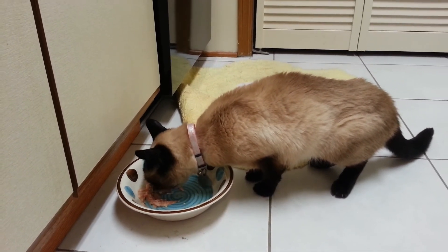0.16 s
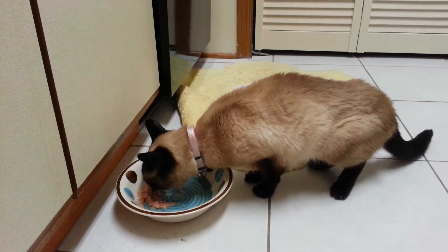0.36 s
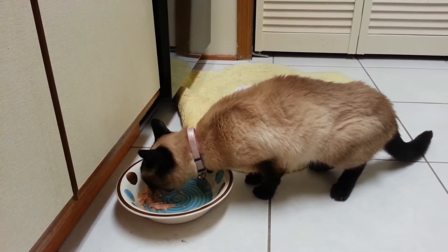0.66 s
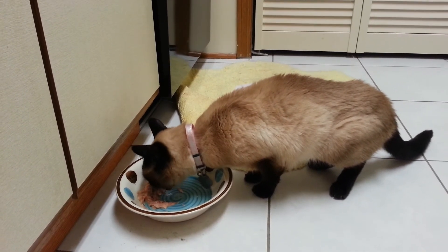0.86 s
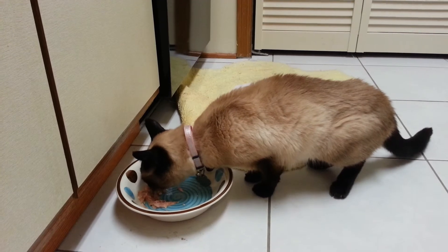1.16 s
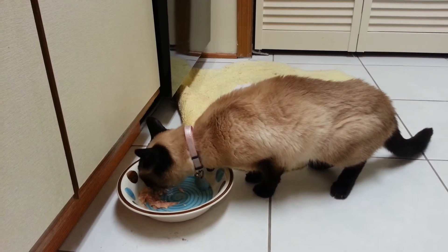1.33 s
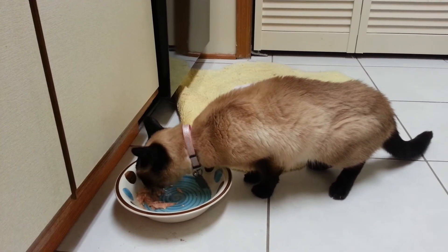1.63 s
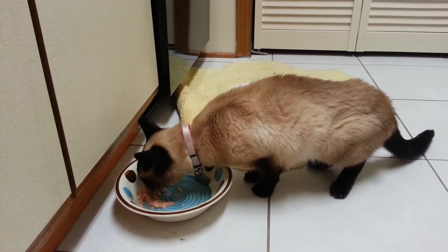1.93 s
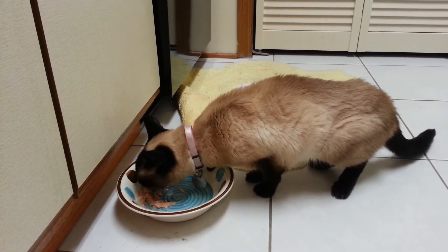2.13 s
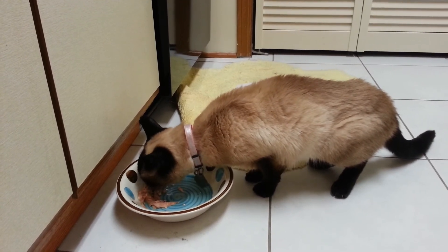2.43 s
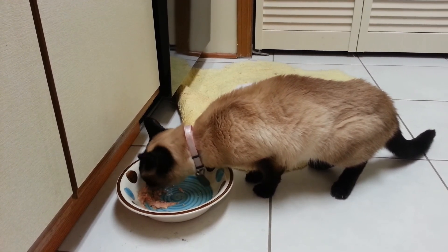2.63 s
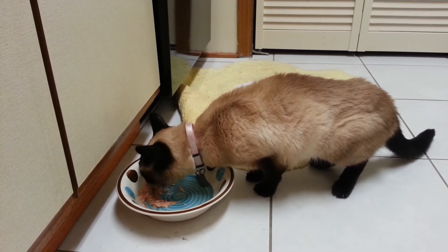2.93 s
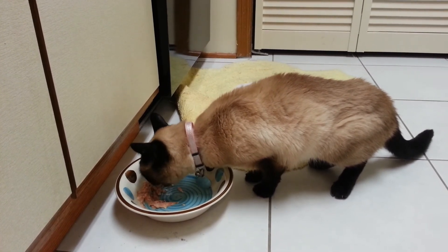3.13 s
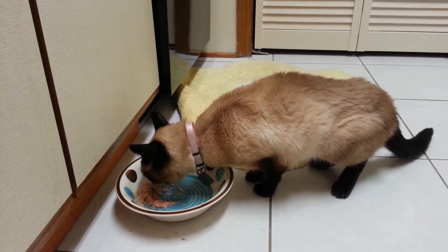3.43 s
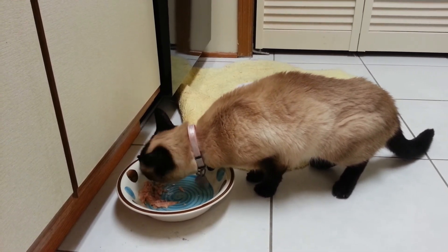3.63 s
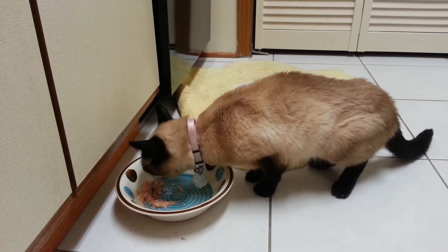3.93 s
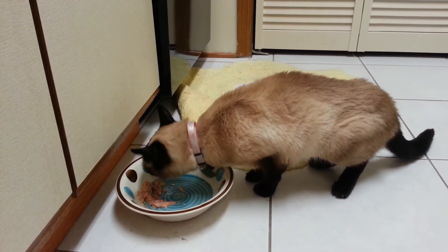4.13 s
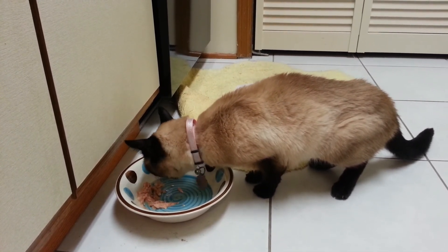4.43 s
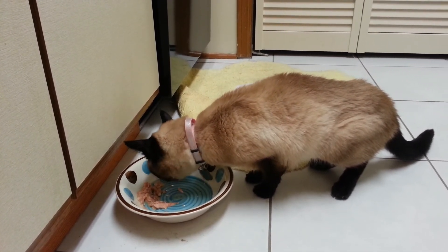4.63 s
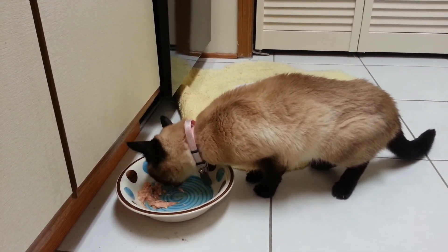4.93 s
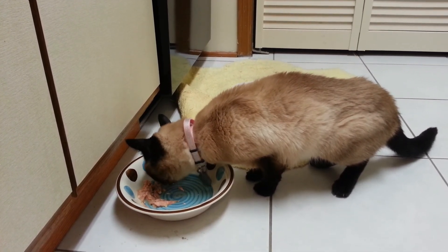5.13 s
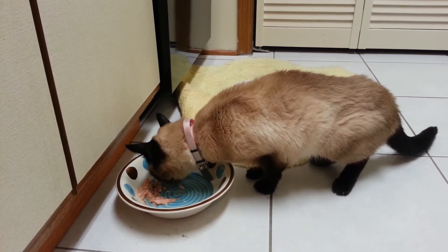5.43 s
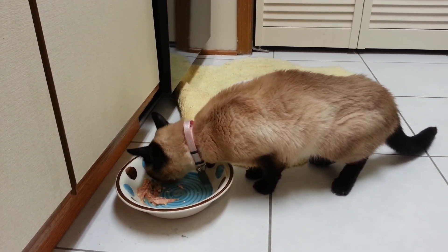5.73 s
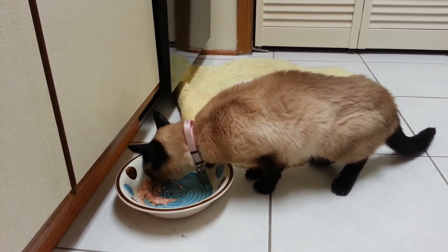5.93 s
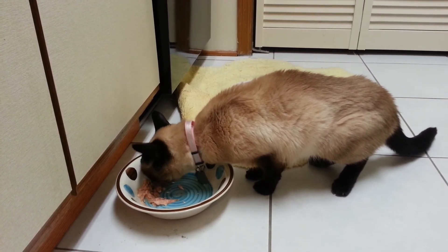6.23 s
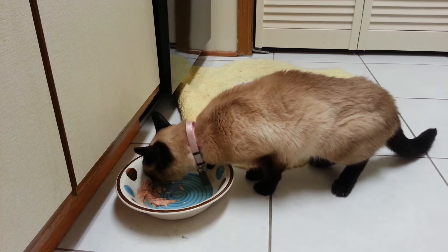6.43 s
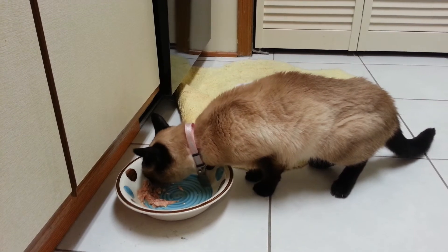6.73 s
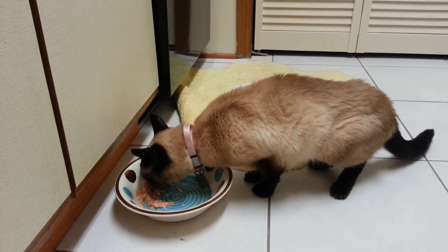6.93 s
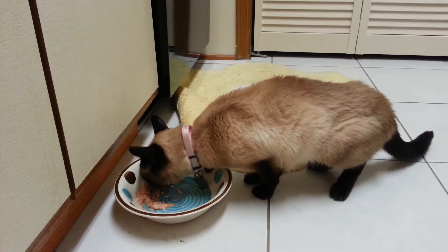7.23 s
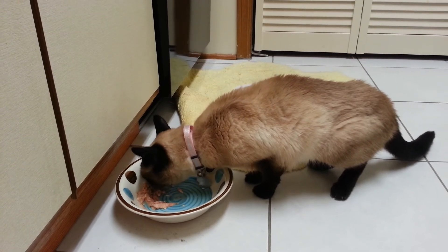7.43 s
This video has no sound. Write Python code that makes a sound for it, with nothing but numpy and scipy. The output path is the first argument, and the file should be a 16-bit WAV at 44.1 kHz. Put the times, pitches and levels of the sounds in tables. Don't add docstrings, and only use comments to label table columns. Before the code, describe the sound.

A cat eats wet food from a ceramic bowl on a tiled floor, heard close in a small hard room. Soft sticky smacks and clinks on the bowl open the scene at 0.1 and 0.35 seconds, with another clink near 0.75. The collar bell rattles quickly from 0.9 to 1.2, then in looser bursts to 2, with a bowl tap near 1.5. Wet ticks gather around 2.1, and a clink at 2.6 leads into the loudest, busiest jingling, until about 3.3. Small lip pops and tongue clicks follow around 3.5. At 4.2 the bowl gives its strongest clear ring; the bell shakes again near 4.45. Later it is sparser: clinks around 5.5, 5.9, 6.2 and 7.0, light bell taps and thin mouth ticks to the end at about 7.5. A faint distant motor hum and airy room tone continue throughout, sinking slightly in the pauses.

```python
import sys
import numpy as np
from scipy import signal
from scipy.io import wavfile
from scipy.ndimage import uniform_filter1d

SR = 44100
rng = np.random.default_rng(int(sys.argv[2]) if len(sys.argv) > 2 else 0)


def amplitude_ratio(level_db):
    exponent = np.asarray(level_db, float) / 20
    return 10 ** exponent


def generate_wav(signal):
    frames = np.transpose(np.atleast_2d(signal))
    scaled = np.clip(frames, -1, 1) * 32767
    pcm = np.round(scaled).astype(np.int16)
    wavfile.write(sys.argv[1], SR, pcm)


N = 333396


def read(points, hz):
    f, value = np.transpose(points)
    return np.interp(np.log(hz + 1), np.log(f + 1), value)


def add(mix, start_s, sound):
    part = mix[:, round(start_s * SR):][:, :sound.shape[1]]
    part += sound[:, :part.shape[1]]


def sides(db):
    return amplitude_ratio([[db / 2], [-db / 2]])


def slow_drift(top_hz):
    t = np.arange(0, N + 256, 256) / SR
    x = sum(np.sin(2 * np.pi * (f * t + rng.random())) / np.sqrt(f) for f in np.geomspace(.2, top_hz, 20))
    return np.interp(np.arange(N) / SR, t, x / x.std())


# freq_hz, density_db (per Hz)
AIR_SPECTRUM = [(20, -49.5), (42, -23), (52, -5), (85, 1), (120, -2), (300, -3), (380, -11.5), (500, -1.5),
                (750, -8), (1100, -9.5), (1500, -12), (2500, -16.5), (6000, -12), (11000, -18.5),
                (15000, -23.5)]
# freq_hz, likeness (0 to 1)
AIR_LIKENESS = [(60, 1), (200, 1), (400, 0.74), (800, 0.37), (1500, 0.), (15000, 0.012)]
# freq_hz, left_minus_right_db
AIR_LEAN = [(60, 1.5), (180, -2), (550, 4), (1650, 5), (4970, 1), (15000, -2.5)]


def air():
    frames, hz = N // 256 + 5, np.fft.rfftfreq(1024, 1 / SR)
    a, b, c, d, patches = rng.standard_normal((frames, 513, 5)).T
    patches = uniform_filter1d(uniform_filter1d(patches, 8, 0), 12, 1)
    same = np.clip(read(AIR_LIKENESS, hz), -1, 1)[:, None]
    left = a + 1j * b
    right = same * left + np.sqrt(1 - same ** 2) * (c + 1j * d)
    z = np.array([left, right])
    z *= amplitude_ratio(read(AIR_SPECTRUM, hz)[:, None] + 1.7 * patches / patches.std())
    z *= amplitude_ratio(np.array([.5, -.5])[:, None, None] * read(AIR_LEAN, hz)[:, None])
    x = signal.istft(z, nperseg=1024, noverlap=768)[1][:, :N]
    x = signal.sosfilt(signal.butter(6, 46, "high", fs=SR, output="sos"), x)
    return amplitude_ratio(-50) * x / x.std()


MOTOR_ORDERS = [2, 4, 5, 18, 19, 20, 22, 25]
# level_db, left_minus_right_db, left_lead_rad
MOTOR_HUM = [(-68.5, 2, -2), (-71, -4, -0.5), (-59, 0, -1.27), (-82.5, 8, 6), (-48.5, -4.5, 3),
             (-58, 1, 3.5), (-77.5, -6, 1.5), (-74.5, -7.5, 4)]


def motor():
    shaft_hz = 59.02
    turns = np.cumsum(shaft_hz * (1 + .0006 * slow_drift(3.3))) / SR
    hum = np.zeros((2, N))
    for order, (db, pan_db, lead) in zip(MOTOR_ORDERS, MOTOR_HUM):
        whine = np.sin(2 * np.pi * order * turns + np.array([[lead], [0]]))
        hum += amplitude_ratio(db + 1.5 * slow_drift(2.9)) * sides(pan_db) * whine
    return hum


def bubbles(rows, glide, fizz_db, lean_db, turn_db):
    t, out = np.arange(2600) / SR, np.zeros((2, N))
    fizz = rng.standard_normal((len(rows), 2, len(t))) * rng.exponential(1, (len(rows), 1, len(t)))
    for (start_s, db, hz, cycles), wet in zip(rows, fizz):
        pan_db = lean_db + turn_db * np.log2(hz / 4000)
        u = t * hz / max(cycles, .5)
        swell = 3.82 * u * np.exp(1 - 2.85 * u)
        pop = swell * np.sin(2 * np.pi * hz * t * (1 + glide * np.minimum(u, 2)))
        band = signal.butter(2, [0.68 * hz, min(1.35 * hz, 12500.)], "band", fs=SR)
        spray = amplitude_ratio(fizz_db - 60 * t / 0.032) * signal.lfilter(*band, wet)
        add(out, start_s, amplitude_ratio(db + 5.5) * sides(pan_db) * (pop + spray))
    return out


# start_s, peak_db, pitch_hz, length_cycles
SMACK_TIMES = [(.09, -45, 4000, 1.1), (.345, -41, 4130, 0.61), (.722, -41, 2770, 2.8),
               (1.441, -42, 6740, 5.2), (2.088, -47, 6130, 3.4), (2.1345, -41.5, 6200, 11),
               (2.528, -42, 1080, 0.8), (2.5425, -44.5, 7100, 4.4), (2.544, -42.5, 2480, 2.6),
               (3.3895, -44, 940, 1.9), (3.456, -43, 1270, 2.4), (3.4625, -61, 1600, 2.4),
               (3.482, -40.5, 1280, 0.84), (3.618, -47.5, 3240, 0.69), (3.621, -54.5, 2030, 4.5),
               (3.72, -50, 1950, 3.4), (4.0245, -45, 6470, 14), (4.025, -36, 2680, 0.53),
               (4.096, -48, 1560, 3), (4.0965, -44.5, 4900, 14), (4.0965, -53.5, 7630, 24),
               (4.18, -46.5, 2600, 1.1), (4.597, -50.5, 2240, 2.6), (4.715, -53, 2550, 4.9),
               (5.015, -45, 4000, 1.55), (5.5, -48.5, 5200, 2), (5.71, -46.5, 3600, 1.25),
               (6.13, -49.5, 3600, 1.3), (6.7165, -43, 4890, 12.5), (6.97, -52.5, 3540, 6.4)]


def smacks():
    return bubbles(SMACK_TIMES, glide=0.018, fizz_db=-2.0, lean_db=5.0, turn_db=-1.0)


BOWL_PITCH = [1007, 2304, 2325, 3967, 4064, 6153, 6173, 6325, 6460, 6546, 7560, 7920, 8274, 8516, 8635,
              9450, 10200, 10380, 10840, 11190, 12490, 14150]
BOWL_DECAY = [1.3, .58, .16, .14, .13, .3, .15, .11, .22, .15, .26, .2, .17, .11, .17, .26, .22, .22, .13,
              .21, .25, .14]
# lip_left_db, lip_right_db, wall_left_db, wall_right_db, left_lead_rad
BOWL_MODES = [(-24.5, -36.5, -18, -28, -0.5), (-18, -17.5, -21.5, -25.5, 1.58), (-28, -18.5, -37, -22, 4),
              (-18, -41, -21, -35, -2), (-2, -8.5, -16, -17, 0.5), (-11, -16, -29, -31, -4.5),
              (-7.5, -12.5, -19, -20.5, 12.5), (-30, -6, -22.5, -14, -1.8), (-36.5, -25.5, -18, -1.5, -9.1),
              (-32, -35.5, -1, -2.5, 5), (-28.5, -28.5, -25, -16.5, 4.5), (-29.5, -14, -44.5, -23.5, 1),
              (-15.5, -19, -30.5, -23.5, 1.5), (-34.5, -6.5, -31.5, -34, -16.5),
              (-21.5, -14.5, -19.5, -8, 3.5), (-16.5, -18, -26.5, -38, 2),
              (-17.5, -21.5, -27.5, -16.5, 4.5), (-32, -23, -26, -26.5, -6), (-9, -0.5, -20, -14.5, 2.5),
              (-20.5, -31, -40, -51, 3), (-43, -29.5, -59, -51, -6), (-34.5, -57, -61.5, -62, -3.5)]
# start_s, lip_db, wall_db, hardness_db (per octave), twin_db (on the lower 4 kHz mode)
BOWL_KNOCKS = [(0.1044, -26.5, -32, -3, -3), (0.351, -41, -22.5, 2, 4), (0.7409, -36.5, -22.5, -1, 0),
               (1.4756, -52, -23, 3.5, 16), (2.5714, -61, -19, 0.5, 14), (4.2337, -16.5, -60.5, 0, 0),
               (5.521, -40.5, -52, -3.5, 5), (5.8714, -34.5, -35.5, -0.5, -2), (6.2234, -36, -29, -2, -10),
               (7.0019, -44, -31, -2.5, -15), (0.43, -50, -39.5, 0, 18.5), (2.185, -62, -62, -8.5, 19.5),
               (2.265, -64, -54, -3.5, 21)]


def bowl():
    rebound_s = 512 / SR
    split_hz, split_share = 16.5, .7
    free_wall, free_lip = 0.39, 0.53
    lip_l, lip_r, wall_l, wall_r, lead = np.transpose(BOWL_MODES)[:, :, None]
    hz, t60 = np.array(BOWL_PITCH)[:, None], np.array(BOWL_DECAY)[:, None]
    t, out = np.arange(26000) / SR, np.zeros((2, N))

    phase = np.array([lead, 0 * lead])
    onset = 1 - np.exp(-t / 0.00022)
    sign = np.where(hz == 6546, -1, 1)
    waves = sign * onset * np.sin(2 * np.pi * hz * t + phase)
    pair = onset * np.sin(2 * np.pi * (hz - split_hz) * t + phase)
    throbbing = (waves + split_share * pair) / (1 + split_share)
    waves = np.where(np.isin(hz, [1007, 4064]), throbbing, waves)
    lower_twin = np.arange(len(hz))[:, None] == 3

    count = len(BOWL_KNOCKS)
    grit_band = signal.butter(2, [300., 9000.], "band", fs=SR)
    grit = signal.lfilter(*grit_band, rng.standard_normal((count, 2, 3000)))
    grit = grit * amplitude_ratio(-60 * t[:3000] / 0.055)
    thud_band = signal.butter(1, [90., 800.], "band", fs=SR)
    thud = signal.lfilter(*thud_band, rng.standard_normal((count, 1, 9000)))
    thud = thud * (1 - np.exp(-t[:9000] / 0.0026)) * amplitude_ratio(-60 * t[:9000] / 0.14)

    for (start_s, lip_db, wall_db, hardness, twin_db), crack, foot in zip(BOWL_KNOCKS, grit, thud):
        lip = amplitude_ratio(lip_db + np.array([lip_l, lip_r]))
        wall = amplitude_ratio(wall_db + np.array([wall_l, wall_r]))
        wall_share = 1 / (1 + amplitude_ratio(lip_db - wall_db))
        loudest_db = max(lip_db, wall_db)
        colour_db = (hardness + 0.82) * np.log2(hz / 7000) + twin_db * lower_twin
        free = free_lip + (free_wall - free_lip) * wall_share
        decay_db = -60 * t / (1.163 * free * t60)
        ring = amplitude_ratio(6.5) * (np.hypot(lip, wall) * amplitude_ratio(colour_db + decay_db) * waves).sum(1)
        start_s -= .0012
        rebound = 0.51 * wall_share
        add(out, start_s, ring / (1 + 0.96 * rebound))
        add(out, start_s + rebound_s, ring * rebound / (1 + 0.73 * rebound))
        add(out, start_s, amplitude_ratio(loudest_db - 15.0) * crack)
        add(out, start_s, amplitude_ratio(0.26 * loudest_db - 23.5) * foot)
    return out


# start_s, peak_db, return_db
BELL_HITS = [(0.9147, -29, -35), (0.978, -28.5, -36), (1.0538, -28, -37), (1.1113, -26, -36),
             (1.2062, -30.5, -43), (1.6807, -34.5, -38), (1.7477, -33, -40.5), (1.8106, -32, -46),
             (2.595, -44, -44), (2.659, -28.5, -36), (2.762, -20.5, -47), (2.8122, -23, -34),
             (2.8999, -30.5, -40), (2.955, -24.5, -33), (3.111, -31, -47), (3.2025, -31, -38),
             (3.26, -32.5, -45), (4.0185, -39, -60), (4.412, -29.5, -41), (4.4678, -28.5, -46),
             (6.2235, -37, -40.5), (6.7638, -35, -41.5)]
# start_s, peak_db
BELL_CHINKS = [(0.104, -45), (0.8108, -44), (0.8445, -40), (1.259, -32.5), (1.354, -36.5), (1.4009, -39.5),
               (1.6264, -32), (1.64, -33.5), (1.6936, -33), (1.923, -37.5), (2.328, -39), (2.4386, -38),
               (2.494, -41.5), (2.5516, -40), (2.7743, -25), (2.8237, -37), (2.8714, -51), (2.911, -34),
               (2.9675, -43), (3.0143, -36.5), (3.955, -43.5), (4.46, -26.5), (4.52, -40.5), (4.548, -55),
               (6.045, -39), (6.13, -49.5), (6.577, -45), (6.6494, -45), (7.1273, -43), (7.483, -45)]
HIT_PAN_DB, REFLECTION_PAN_DB, CHINK_PAN_DB = -4., 9.5, -1.6


def strikes():
    return_s = 0.031
    shake_s, shake_db = 0.013, -8.5
    direct = [(s, db, HIT_PAN_DB) for s, db, _ in BELL_HITS]
    reflected = [(s + return_s, db, REFLECTION_PAN_DB) for s, _, db in BELL_HITS]
    chinks = [(s, db, CHINK_PAN_DB) for s, db in BELL_CHINKS]
    shaken = [(s + shake_s, wall_db + shake_db, CHINK_PAN_DB) for s, _, wall_db, _, _ in BOWL_KNOCKS]
    return direct + reflected + chinks + shaken


# pitch_hz, level_db, t60_s
BELL_MODES = [(5791, 0.5, 0.04), (5630, -6, 0.031), (5946, -7, 0.032), (6290, -9.5, 0.018),
              (10870, -20, 0.038), (13650, -17, 0.0175), (5280, -10, 0.019)]


def bell():
    tick_s, rise_s = .0007, .0014
    early_s, early_db = .0125, -7.5
    t, out = np.arange(2000) / SR, np.zeros((2, N))
    hz, db, t60 = np.transpose(BELL_MODES)[:, :, None]
    hits = strikes()
    chance = rng.random((len(hits), 4 * len(BELL_MODES) + 4))
    tick_hz = 7600.0 - 710000.0 * np.minimum(t, .003)
    tick = amplitude_ratio(-11.0) * np.exp(-t / tick_s) * np.sin(2 * np.pi * tick_hz * t)
    choke = 0.1397 + 0.89 / (1 + np.exp((t - .0065) / 0.00082))
    envelope = (1 - np.exp(-(t / rise_s) ** 2)) * choke
    for (start_s, peak_db, pan_db), u in zip(hits, chance):
        spot, detune, left, right = u[4:].reshape(4, -1, 1)
        ring = amplitude_ratio(db + 5. * (spot - .5) - 60 * t / t60) * envelope
        turns = hz * (1 + 0.018 * (detune - .5)) * t
        phases = (left, left + 0.1 + 0.2 * right)
        hit = np.array([(ring * np.sin(2 * np.pi * (turns + phase))).sum(0) for phase in phases])
        size = amplitude_ratio(peak_db + 4.0) * sides(pan_db)
        sharp = pan_db != REFLECTION_PAN_DB
        add(out, start_s - .0015, (hit + tick * sharp) * size)
        add(out, start_s + early_s + .002 * (u[0] - .5), amplitude_ratio(early_db - 4. * u[1]) * hit * size)
        add(out, start_s + .016 + 0.015 * u[2], amplitude_ratio(-11.5 - 8.9 * u[3]) * hit * size)
    return out


# start_s, peak_db, pitch_hz, length_cycles
TICK_TIMES = [(0.597, -43, 7200, 2.8), (2.1353, -38.5, 7000, 6.3), (2.2218, -34.5, 7300, 1.6),
              (2.2394, -47, 8200, 2.5), (2.4199, -43, 7160, 3), (2.9867, -36.5, 7700, 1.5),
              (3.236, -32, 8200, 0.72), (3.6148, -36, 9400, 6.1), (3.6149, -39, 6900, 4.5),
              (3.628, -44, 6550, 6), (3.9554, -44, 6700, 1.9), (4.1819, -45, 7700, 4.2),
              (4.4877, -41, 7450, 2.2), (5.013, -43, 6770, 2.5), (6.129, -37.5, 6150, 1.9),
              (6.3505, -39.5, 9550, 2.4), (6.6498, -39, 6500, 2.7), (6.761, -46, 7930, 1.5),
              (7.3861, -41, 7500, 2.1), (7.4639, -55, 7230, 3.1)]


def ticks():
    return bubbles(TICK_TIMES, glide=0.017, fizz_db=-11.5, lean_db=-8.0, turn_db=1.7)


# freq_hz, t60_s
ROOM_DECAY = [(200, 0.73), (1000, 0.19), (4000, 0.24), (8000, 0.26), (15000, 0.059)]


def room(x):
    taps = np.zeros((2, SR // 2))
    at = np.arange(180, SR // 2 - 20, 20) + rng.integers(0, 20, (2, (SR // 2 - 181) // 20))
    np.put_along_axis(taps, at, rng.choice([-1., 1.], at.shape), 1)
    hz, t, z = signal.stft(taps, SR, nperseg=256)
    z = z * amplitude_ratio(-60 * t / read(ROOM_DECAY, hz)[:, None])
    tail = signal.istft(z, SR, nperseg=256)[1]
    return signal.oaconvolve(x, tail / np.linalg.norm(tail[0]), axes=1)[:, :N]


def scene():
    background = air() + motor()
    cat = smacks() + ticks()
    ware, jingle = bowl(), bell()
    tail = room(amplitude_ratio(-4.0) * ware + amplitude_ratio(-2.94) * jingle + amplitude_ratio(-2.5) * cat)
    return ware + jingle + cat + tail + background


def low_pass(x):
    return signal.sosfilt(signal.butter(12, 15730, fs=SR, output="sos"), x)


# freq_hz, gain_db
GATE_SHUT = [(60, -3.5), (500, -6), (1500, -10), (6000, -15), (15000, -12)]


def record(dry):
    hz, t, z = signal.stft(dry, SR, nperseg=512, noverlap=384)
    level_db = 10 * np.log10((abs(z[:, hz > 1500]) ** 2).sum((0, 1)) + 1e-12)
    quiet_db = np.median(np.sort(level_db)[:len(t) // 4])
    opened = np.clip((level_db - quiet_db - .6) / 15.16, 0, 1) ** 0.67
    fall = t / 0.084
    opened = np.maximum.accumulate(opened + fall) - fall
    opened = uniform_filter1d(opened, size=7, origin=-2)
    z = z * amplitude_ratio(read(GATE_SHUT, hz)[:, None] * (1 - opened))

    power = uniform_filter1d(uniform_filter1d(abs(z) ** 2, size=8, axis=1), size=8, axis=2)
    band_db = 10 * np.log10(power + 1e-16)
    masked = (hz[:, None] > 11400) & (band_db < uniform_filter1d(level_db, size=8) - 47.)
    beyond = (hz[:, None] > 14650) & (band_db < -80.)
    gated = signal.istft(z * ~(masked | beyond), SR, nperseg=512, noverlap=384)[1][:, :N]
    return low_pass(gated)


dry = scene()
out = record(dry)
generate_wav(out)
```